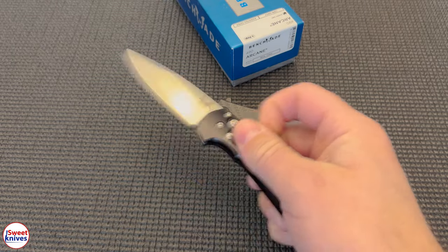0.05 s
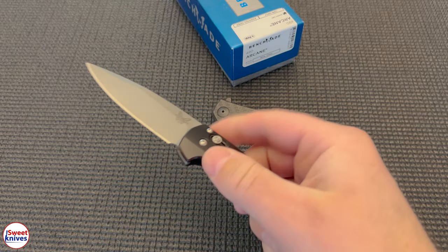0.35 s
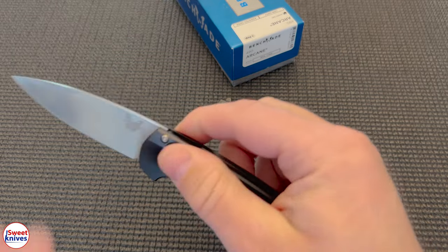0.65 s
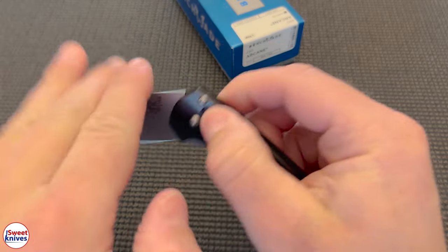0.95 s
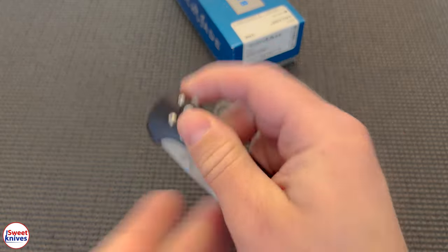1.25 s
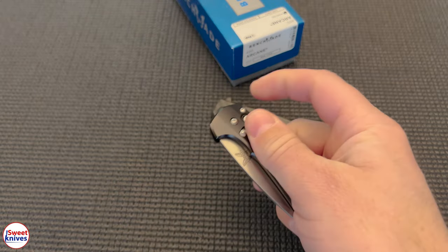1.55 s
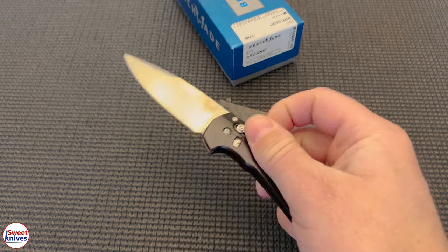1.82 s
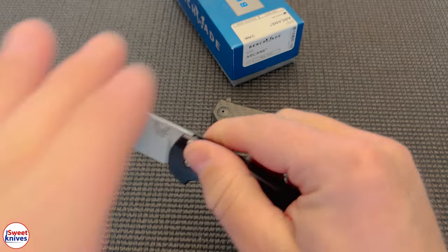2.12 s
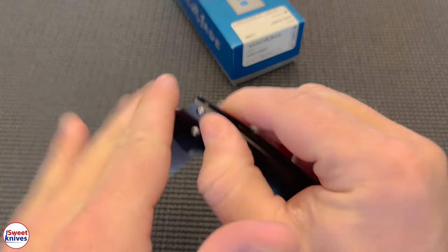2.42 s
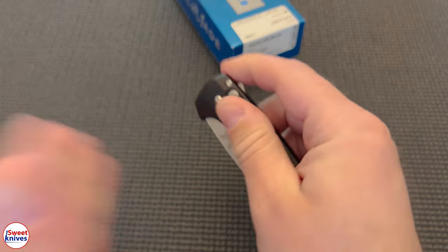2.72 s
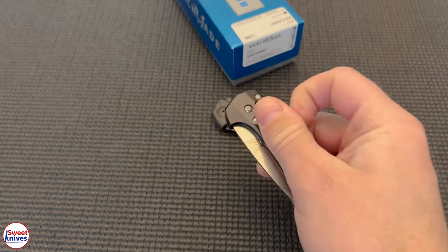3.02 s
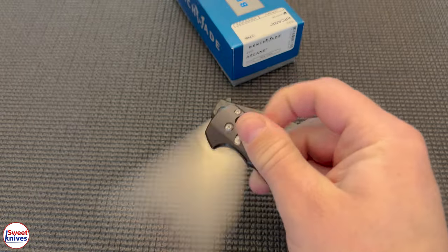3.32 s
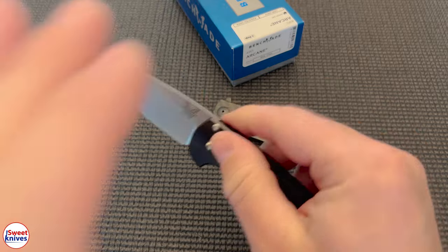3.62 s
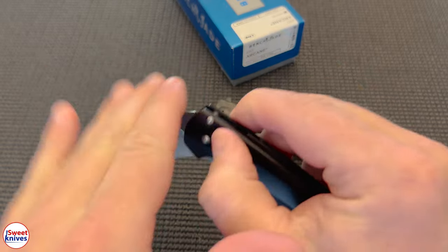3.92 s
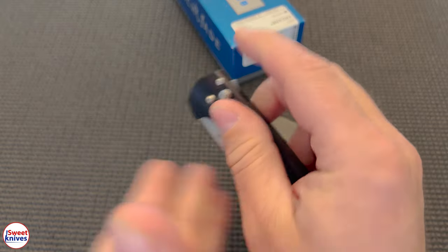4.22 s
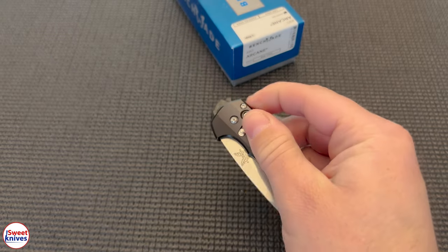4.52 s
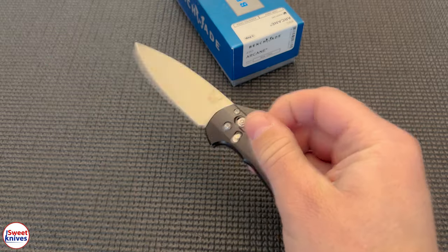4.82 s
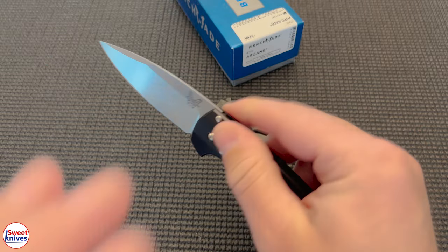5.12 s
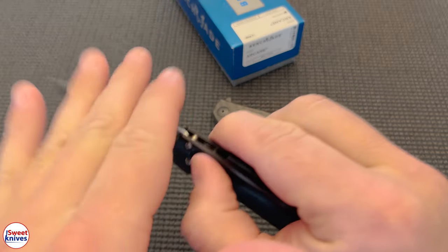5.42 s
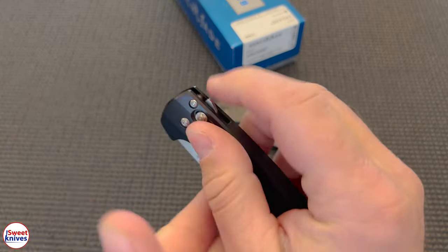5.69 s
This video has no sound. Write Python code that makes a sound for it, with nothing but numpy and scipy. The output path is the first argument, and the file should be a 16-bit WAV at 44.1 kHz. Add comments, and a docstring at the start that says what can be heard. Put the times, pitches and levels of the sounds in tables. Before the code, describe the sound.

Close up in a small room, a pocket knife's blade swings out and locks with a hard, bright click, ringing faintly. A quieter lock click and slight rubbing follow, then a crisp snap as it closes. This happens four times at an even pace, with small metal ticks between and a short echo. A low hum and rumble lies underneath, dipping now and then.

```python
"""A small room, a stereo microphone close to a padded table: a folding knife is flicked open and swung
shut four times. Opening, the pivot zips and the blade slams on its stop pin, then sings faintly.
Closing, the lock bar clicks free, pivot and palm rub, loose parts tick, the bar snaps home and the
blade bounces into the handle. The walls answer. Under it all lie a steady machine hum and rumble,
which the recorder's noise suppression turns down at times."""
import sys
import numpy as np
from scipy import signal
from scipy.fft import rfft, irfft, next_fast_len
from scipy.io import wavfile
from scipy.ndimage import uniform_filter1d

SR = 44100
rng = np.random.default_rng(int(sys.argv[2]) if len(sys.argv) > 2 else 0)


def transcribe(u):
    """Save the signal u as a 16-bit wav file named by the first command-line argument.

    u: samples, shape (n,) or (channels, n), limited to [-1, 1]; the rate is SR.
    q: integer samples, one column per channel.
    """
    v = np.clip(np.atleast_2d(u).T, -1, 1)
    q = np.round(v * 32767).astype(np.int16)
    wavfile.write(sys.argv[1], SR, q)


N = 253575

# Levels in all tables are relative.
# the blade hits its stop pin: (time [s], click [dB], treble [dB], thump [dB], swing [s], swing [dB])
OPENS = [(0.0808, -2, 1, -35.5, 0.041, -54.5), (1.7893, -1, 3, -29.5, 0.037, -53),
         (3.3889, -2, 2, -28, 0.033, -51), (4.8504, -2.5, 2, -31.5, 0.035, -53)]
# the blade is folded shut: (lock freed [s], its click [dB], snap home [s], snap [dB],
# fall to the handle [s], landing [dB], thump [dB], palm rub [dB])
CLOSES = [(0.7803, -32, 1.1546, -6, 0.0062, -10.5, -26, -69),
          (2.2147, -20.5, 2.5913, -4, .0063, -13, -29.5, -78),
          (3.7811, -21, 4.118, -7, .0083, -17.5, -34, -80),
          (5.3352, -19.5, 5.6603, -6, .008, -18.5, -27.5, -82)]
# steel sliding on steel at the pivot: (frequency [Hz], level [dB])
PIVOT_COLOUR = [(500, -13.5), (1500, -11), (2300, 2), (3200, -10.5), (4400, 0.5), (7500, -2), (9000, -4.5),
                (10200, -8.5), (12000, -8.5), (14000, -15.5), (16000, -19)]


def amp(db):
    """Decibels to gain."""
    return 10 ** (np.asarray(db) / 20)


def unit(x):
    """Scale to rms 1."""
    return x / np.sqrt(np.mean(x ** 2) + 1e-20)


def along(points, hz):
    """Read (frequency [Hz], value) points on a log frequency axis."""
    freqs, values = np.transpose(points)
    return np.interp(np.log(hz + 1), np.log(freqs + 1), values)


def filtered(x, response):
    """Filter x by a gain given as a function of frequency."""
    n = x.shape[-1]
    padded = next_fast_len(n + 8192)
    return irfft(rfft(x, padded) * response(np.fft.rfftfreq(padded, 1 / SR)), padded)[..., :n]


def noise(colour, size):
    """Noise of rms 1, coloured by (frequency [Hz], level [dB]) points."""
    return unit(filtered(rng.standard_normal(size), lambda hz: amp(along(colour, hz))))


def add(track, s, x):
    """Mix x into track from time s."""
    part = track[..., max(round(s * SR), 0):][..., :x.shape[-1]]
    part += x[..., :part.shape[-1]]


def room_tone(rumble_db=-54, apart_db=-16, trim_db=0.2, hiss_db=-81):
    """Steady machine hum and rumble, turned down at times by the recorder's noise suppression; hiss."""
    hum_tones = [(57.8, -69), (119.3, -60.5), (193.6, -64.5)]  # the machine: (frequency [Hz], level [dB])
    rumble_colour = [(20, -30), (40, -14), (58, 10.5), (85, -11), (120, -1), (160, -9.5), (220, -9.5),
                     (300, -21), (500, -27.5), (800, -41), (1400, -52.5), (4000, -76.5)]  # the room's low end: (frequency [Hz], level [dB])
    hiss_colour = [(300, -4), (750, 2.5), (1300, -5), (3000, -11.5), (6000, -14), (9000, -18.5),
                   (12000, -20), (16000, -29.5)]  # the faint noise floor: (frequency [Hz], level [dB])
    suppression = [(0.0, -51.5), (2.19, -51.6), (2.27, -61.5), (2.37, -62), (2.47, -53.5), (3.0, -51),
                   (3.42, -53), (3.6, -63), (4.08, -64.5), (4.16, -55.5), (4.45, -56.5), (4.58, -51.5),
                   (4.84, -52), (5.0, -61.5), (5.38, -64), (5.75, -52.5)]  # hum and rumble as noise suppression leaves them: (time [s], level [dB])
    t = np.arange(N) / SR
    hum = np.zeros(N)
    for hz, db in hum_tones:
        waver = .4 * noise([(1, 2.5), (5, -5.5), (20, -45.5), (100, -120)], N)
        hum += amp(db) * np.sqrt(2) * np.sin(2 * np.pi * hz * t + waver)
    rumble = amp(rumble_db) * (noise(rumble_colour, N) + amp(apart_db) * noise(rumble_colour, (2, N)))
    level = amp(trim_db + np.interp(t, *np.transpose(suppression)))
    return unit(hum + rumble) * level + amp(hiss_db) * noise(hiss_colour, (2, N))


def pivot_zip(length_s, start_hz=4800, end_hz=9300, squeak=0.97):
    """The pivot rubs, with a thin squeak that climbs as the blade speeds up."""
    progress = np.linspace(0, 1, round(length_s * SR))
    jitter_hz = 900 * rng.standard_normal(len(progress))
    pitch = end_hz + (start_hz - end_hz) * (1 - progress) ** 2 + jitter_hz
    rub = noise(PIVOT_COLOUR, len(progress)) + squeak * np.sin(2 * np.pi * np.cumsum(pitch) / SR)
    return rub * np.interp(progress, [0, .12, .35, .7, 1], [0.25, 1.6, 0.5, 1.8, 1.6])


def room_echo(x, gap_s=0.0082, build_s=.003):
    """Stereo echo: a gap until the nearest wall answers, then each frequency dies at its own speed."""
    decay_times = [(100, 2.5), (600, 0.55), (2000, 0.41), (5000, 0.4316), (9000, 0.3182), (12000, 0.23),
                   (16000, 0.21)]  # reverberation: (frequency [Hz], time to fall 60 dB [s])
    echo_colour = [(60, -13), (300, -3), (1200, 1.5), (2500, -5.5), (4700, 0), (7000, -3), (9400, -1),
                   (10200, -5.5), (11700, -1.5), (13300, -12), (15200, -8.5), (16200, -25.5)]  # what the walls return: (frequency [Hz], level [dB])
    likeness = [(200, 0.4), (700, 0.9), (3000, 0.056), (7000, 0.07), (9500, 1)]  # echo at the microphone: (frequency [Hz], left-right likeness [0-1])
    hz, t, (mid, side) = signal.stft(rng.standard_normal((2, SR * 3 // 5)), SR, nperseg=256)
    spread = np.arccos(np.clip(along(likeness, hz), 0, 1))[:, None] / 2
    stereo = np.cos(spread) * mid + np.multiply.outer([1, -1], np.sin(spread) * side)
    decay = amp(-60 * t / along(decay_times, hz)[:, None])
    tail = signal.istft(stereo * decay, SR, nperseg=256)[1]
    tail *= np.clip((np.arange(tail.shape[1]) / SR - gap_s) / build_s, 0, 1)
    tail = filtered(tail / np.linalg.norm(tail[0]), lambda f: amp(along(echo_colour, f)))
    return signal.fftconvolve(x[None], tail, axes=1)


def in_room(x, room_db):
    """A close sound with its echo behind it."""
    both = amp(room_db) * room_echo(x)
    add(both, 0, x)
    return both


def strike(db, colour, modes, treble_db, bright_t60, ring_t60, rise_s, room_db, size=8192):
    """Steel on steel, with its echo: a burst of micro-impacts through the part's resonances."""
    t, hz = np.arange(size) / SR, np.fft.rfftfreq(size, 1 / SR)
    chatter = rng.standard_normal(size) * (1 - np.exp(-(t / rise_s) ** 2))
    bright, ring = (rfft(unit(chatter * amp(-60 * t / t60))) for t60 in (bright_t60, ring_t60))
    bright_share = along([(1500, 0.97), (4000, 0.09), (6500, 0.12), (9000, 0.99)], hz)
    burst = bright_share * bright + (1 - bright_share) * ring  # the top dies first, the middle rings on
    burst /= np.sqrt(uniform_filter1d(abs(burst) ** 2, size=170))  # a hard blow excites all bands evenly
    modes_db = sum(peak / (1 + (2 * (hz - centre) / width) ** 2) for centre, width, peak in modes)
    shelf_db = treble_db * along([(6000, 0.032), (10000, 0.97)], hz)
    cepstrum = irfft(np.log(amp(along(colour, hz) + modes_db + shelf_db)))
    body = np.exp(rfft(2 * cepstrum * (t > 0) * (np.arange(size) < size // 2)))  # causal resonances
    # the microphone hears one jagged spectrum, the walls the smooth mean over all directions
    direct, radiated = (unit(irfft(spectrum)[:size // 2]) for spectrum in (burst * body, body))
    both = amp(room_db) * room_echo(radiated)
    add(both, 0, direct)
    return amp(db - 26.0) * both


def thump(colour, lag_cycles, size=8192):
    """One low push; each frequency arrives the same number of cycles late, so it falls in pitch."""
    hz = np.fft.rfftfreq(size, 1 / SR)
    lag = np.exp(-2j * np.pi * lag_cycles * np.log((hz + 1) / 400))
    push = irfft(amp(along(colour, hz)) * lag)[:size // 2]
    return push / abs(push).max()


def openings():
    """The thumb works the blade loose; it swings out, strikes the stop pin and jolts the hand."""
    pin_colour = [(200, -33.5), (1000, -23), (2000, -11), (3300, -10.5), (4500, -7), (7000, -4.5),
                  (9000, -3.5), (10200, -3), (12000, 0.5), (14500, 1.5), (16500, -13.5)]  # blade on stop pin: (frequency [Hz], level [dB])
    blade_modes = [(2340, 490, 9.5), (4280, 600, 8.5), (4790, 120, 7.5), (5500, 130, 8), (5960, 220, 5),
                   (6820, 770, 4.5), (7230, 360, 5), (7230, 190, 5), (8050, 150, -4.5), (8850, 280, 7),
                   (9560, 230, 6.5), (11600, 220, 8)]  # the open blade rings: (frequency [Hz], width [Hz], gain [dB])
    recoil_colour = [(20, -13), (45, 0.5), (80, 6), (130, 3), (200, -7.5), (380, -8.5), (600, -15.5),
                     (1000, -30.5), (2500, -52.5)]  # the hand recoils: (frequency [Hz], level [dB])
    out = np.zeros((2, N))
    push = np.linspace(0, 1, round(0.057 * SR)) ** 2
    for s, click_db, treble_db, thump_db, swing_s, swing_db in OPENS:
        loosening = amp(swing_db - 15) * push * noise(PIVOT_COLOUR, len(push))
        add(out, s - swing_s - len(push) / SR, in_room(loosening, room_db=-6))
        add(out, s - swing_s, in_room(amp(swing_db) * pivot_zip(swing_s), room_db=-13))
        add(out, s, strike(click_db, pin_colour, blade_modes, treble_db,
                           bright_t60=.0042, ring_t60=0.01, rise_s=0.00081, room_db=-6))
        add(out, s, in_room(amp(thump_db) * thump(recoil_colour, lag_cycles=1.35), room_db=-18))
    return out


def blade_singing(t60_s=.36, spread_db=2):
    """After each opening the locked blade's sharpest modes outlast the click."""
    partials = [(4670, -49), (4895, -49), (5260, -50), (6900, -50), (6990, -50), (7035, -48), (8110, -56),
                (9290, -52)]  # the blade's faint tones: (frequency [Hz], level [dB])
    out, t = np.zeros(N), np.arange(SR // 2) / SR
    fade = amp(-60 * t / t60_s) * (1 - np.exp(-t / .002))
    for s, click_db, *_ in OPENS:
        for hz, db in partials:
            chance, phase = rng.standard_normal(2)
            tone = np.sin(2 * np.pi * (hz * t + phase))
            add(out, s, amp(click_db + db + spread_db * chance) * fade * tone)
    return out


def closings(slot_hz=2700, slot_width_hz=1700, bounce_s=.0046):
    """The lock bar clicks free and later snaps home; the blade drops into the handle and bounces once."""
    snap_colour = [(200, -10), (1000, -19), (2000, -11.5), (2900, -0.5), (4000, -8), (7000, -6),
                   (8500, -10), (10050, -11), (11000, 3), (13000, -3), (13900, 2.5), (15500, -6.5),
                   (16700, -9.5)]  # the lock bar's contact: (frequency [Hz], level [dB])
    lock_modes = [(3023, 500, -3.5), (4497, 420, 12.5), (5750, 1100, 8), (8360, 700, 7.5), (9220, 470, 8.5),
                  (12230, 400, 7.5), (12400, 590, -2), (15200, 1200, 4.5)]  # the lock bar rings: (frequency [Hz], width [Hz], gain [dB])
    landing_colour = [(200, -22), (900, -11.5), (2000, -9.5), (3000, -7), (4000, -0.5), (6000, -7),
                      (9000, -1), (10200, -1.5), (12000, -10.5), (14000, -8), (15500, -7.5), (16500, -23)]  # blade on handle: (frequency [Hz], level [dB])
    liner_modes = [(2750, 500, 3), (4100, 550, 7), (4650, 550, 8), (5400, 600, 3), (7100, 700, 5),
                   (11800, 1400, 6)]  # the handle liners ring: (frequency [Hz], width [Hz], gain [dB])
    recoil_colour = [(30, -30.5), (100, -6.5), (190, 5), (350, -1.5), (700, -1.5), (1100, -4),
                     (2500, -33.5)]  # the hand recoils: (frequency [Hz], level [dB])
    # a tight grip mutes the broad resonance of the handle's slot, a loose one lets it sound
    tight_grip = list(lock_modes) + [(slot_hz, slot_width_hz, -16)]
    loose_grip = list(lock_modes) + [(slot_hz, slot_width_hz, 3.5)]
    out = np.zeros((2, N))
    ramp = np.linspace(0, 1, round(0.016 * SR))
    for freed, free_db, home, snap_db, fall_s, land_db, jolt_db, _ in CLOSES:
        free_treble_db = 1.5 + .8 * (free_db + 20)  # a gentler release is duller
        add(out, freed, strike(free_db, snap_colour, tight_grip, free_treble_db,
                               bright_t60=0.0096, ring_t60=.012, rise_s=0.00068, room_db=-13))
        scrape = amp(snap_db - 50.5) * ramp * noise(PIVOT_COLOUR, len(ramp))  # the bar rides up its ramp
        add(out, home - len(ramp) / SR, scrape)
        add(out, home, strike(snap_db, snap_colour, loose_grip, treble_db=7,
                              bright_t60=0.008, ring_t60=.011, rise_s=0.00062, room_db=-14))
        landing = (home + fall_s, land_db, -3, jolt_db)
        rebound = (home + fall_s + bounce_s, land_db - 8, 2.5, jolt_db - 6.5)  # weaker and brighter
        for s, db, treble_db, thump_db in (landing, rebound):
            add(out, s, strike(db, landing_colour, liner_modes, treble_db,
                               bright_t60=.009, ring_t60=.016, rise_s=0.00074, room_db=-20.5))
            add(out, s, in_room(amp(thump_db) * thump(recoil_colour, lag_cycles=1.4), room_db=-23.5))
    return out


def rubbing(grain_db=2, press_db_per_s=28, lift_db_per_s=400):
    """The pivot drags at both ends of each fold; the palm slides ever harder on the blade, then lifts."""
    drag_colour = [(1000, -23), (3500, -22), (4200, -9), (4550, 3), (5300, -12), (6500, -6), (8000, -19.5),
                   (12000, -21), (16000, -34.5)]  # the slowly turning pivot: (frequency [Hz], level [dB])
    skin_colour = [(300, -8), (700, -6), (1150, 1), (1800, 0.5), (2600, -10), (6000, -15), (16000, -33.5)]  # palm on the blade's back: (frequency [Hz], level [dB])
    t = np.arange(N) / SR
    swell = lambda s, width_s: np.exp(-((t - s) / width_s) ** 2)
    pivot, palm = np.zeros((2, N))
    for freed, _, home, *_, palm_db in CLOSES:
        pivot += amp(-73.5) * swell(freed + 0.053, width_s=0.052)
        pivot += amp(-74) * swell(home - .06, width_s=.065)
        palm += amp(palm_db - np.maximum(press_db_per_s * (home - t), lift_db_per_s * (t - home)))
    stick_slip = amp(grain_db * noise([(20, 1), (150, -6), (600, -38.5), (2000, -100)], N))
    return stick_slip * (pivot * noise(drag_colour, (2, N)) + palm * noise(skin_colour, (2, N)))


def ticking(ring_width_hz=520, ring_db=14, faint_per_fold=3, faint_db=-60, spread_db=2.5, faint_hz=4600):
    """Loose parts tick as the grip shifts; a few fainter ticks fall by chance during each fold."""
    clear_ticks = [(0.8882, -51.5, 5560), (0.9805, -45, 4450), (1.0266, -36, 4600), (1.405, -46, 4550),
                   (1.413, -38.5, 4180), (2.4767, -39, 4540), (2.9535, -34, 4210), (2.9746, -22.5, 4156),
                   (2.99, -32.5, 4190), (4.0603, -37, 4847), (5.5742, -40.5, 4550)]  # loose parts touch: (time [s], level [dB], ring [Hz])
    tick_colour = [(300, -18), (1200, -11.5), (3000, -10), (4500, -8), (8000, -8), (10200, -11),
                   (12000, -8), (16000, -19)]  # a light contact: (frequency [Hz], level [dB])
    out = np.zeros((2, N))
    faint_ticks = [(freed + when * (home - freed), faint_db + spread_db * (2 * force - 1), faint_hz)
                   for freed, _, home, *_ in CLOSES for when, force in rng.random((faint_per_fold, 2))]
    for s, db, hz in list(clear_ticks) + faint_ticks:
        add(out, s, strike(db, tick_colour, [(hz, ring_width_hz, ring_db)], treble_db=0,
                           bright_t60=0.013, ring_t60=0.015, rise_s=0.00072, room_db=-15))
    return out


def microphone(hz):
    """Stereo response to the close knife: mostly stronger on the left, but a little later there."""
    balance = [(300, 2.5), (1000, 3), (2500, 3.5), (4200, 7.5), (6800, 10.5), (8200, 3), (10000, -1),
               (15000, -1.5)]  # between the channels: (frequency [Hz], left minus right [dB])
    left_lag = [(300, .0002), (1400, .0001), (2000, .00012), (2400, .00029), (4500, .00018), (6000, .0002),
                (8500, .000243), (16000, .00025)]  # arrival on the left: (frequency [Hz], lag behind the right [s])
    side = np.array([[.5], [-.5]])
    return amp(side * along(balance, hz)) * np.exp(-2j * np.pi * hz * side * along(left_lag, hz))


def scene():
    """The knife close to the microphone, the room tone behind it."""
    knife = openings() + blade_singing() + closings() + ticking() + rubbing()
    return filtered(knife, microphone) + room_tone()


def record(dry, ceiling=.9, top_hz=16900):
    """The recorder rounds the highest peaks and keeps nothing above its band limit."""
    rounded = dry / (1 + abs(dry / ceiling) ** 4) ** (1 / 4)
    return filtered(rounded, lambda hz: 1 / (1 + (hz / top_hz) ** 200))


dry = scene()
out = record(dry)
transcribe(out)
```